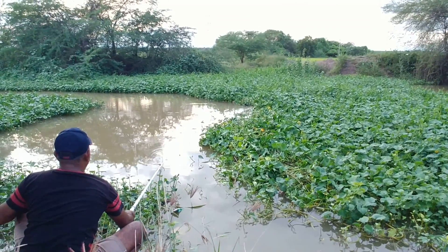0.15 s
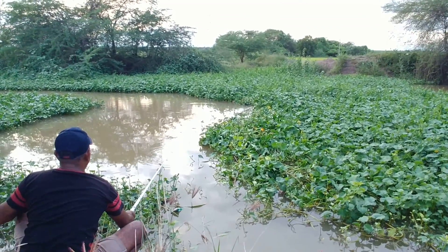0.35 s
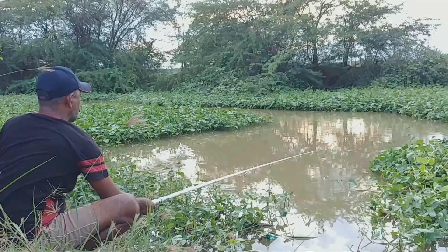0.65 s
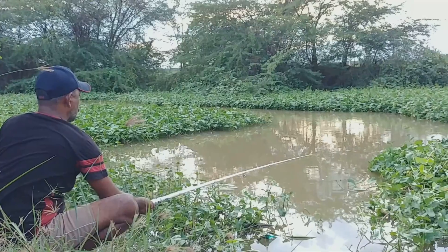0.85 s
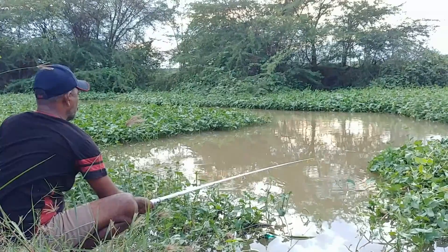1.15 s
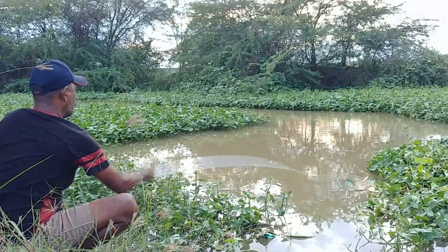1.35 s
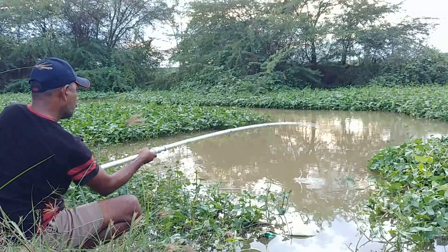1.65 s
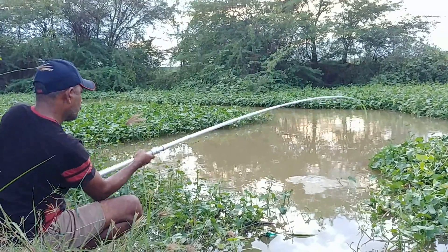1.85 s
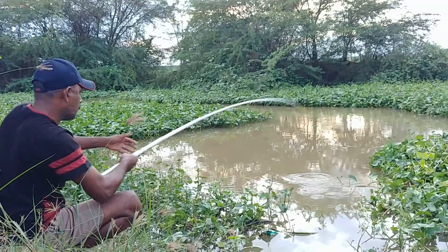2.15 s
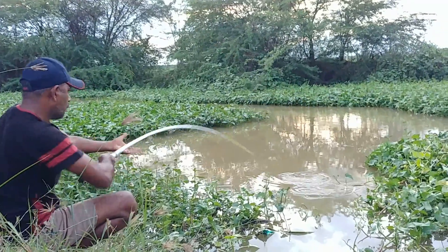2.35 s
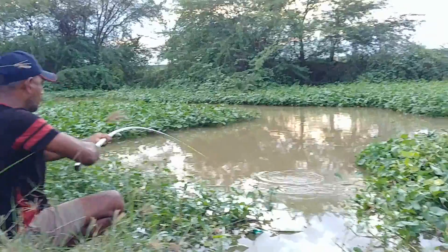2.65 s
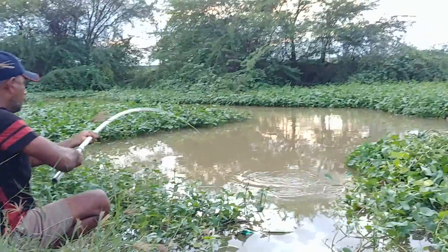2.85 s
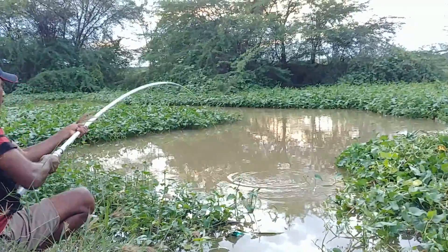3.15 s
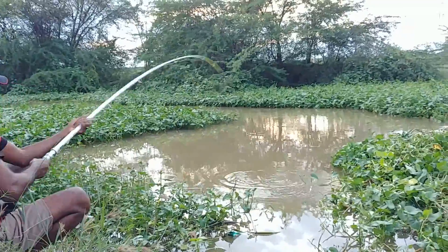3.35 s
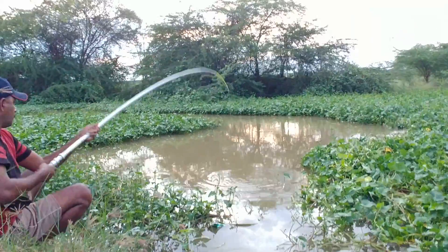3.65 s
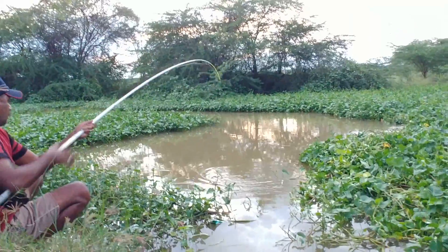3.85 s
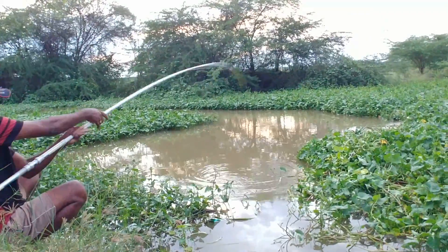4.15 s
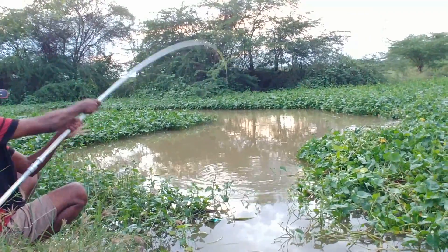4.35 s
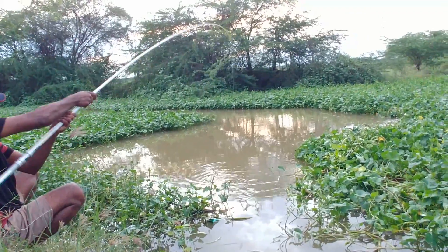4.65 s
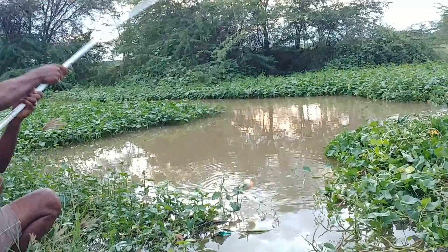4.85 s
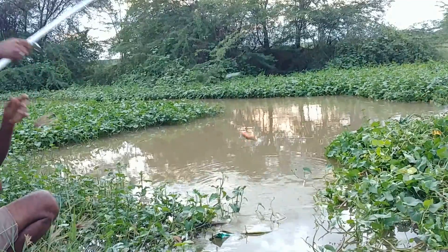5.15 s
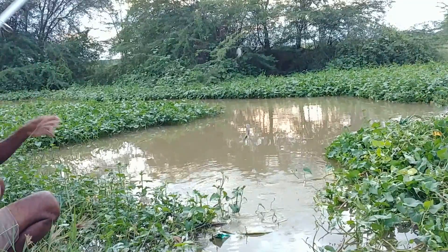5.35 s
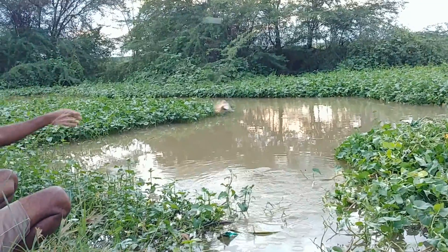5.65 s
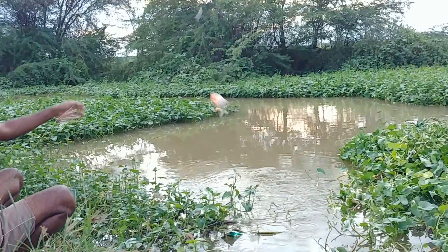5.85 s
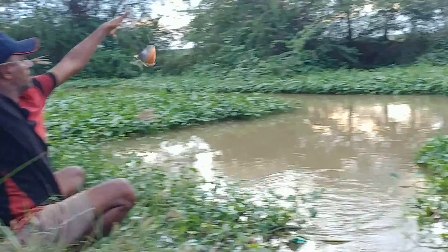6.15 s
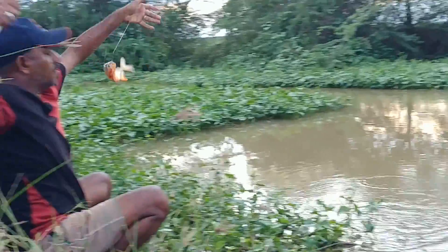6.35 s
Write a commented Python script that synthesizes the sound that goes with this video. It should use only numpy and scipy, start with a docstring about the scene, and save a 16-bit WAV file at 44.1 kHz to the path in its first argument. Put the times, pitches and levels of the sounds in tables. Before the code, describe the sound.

A broad low rush fills the first half second and stops abruptly, leaving open air, a faint distant engine hum and shrill crickets strongly on the left. Small birds twitter in quick sliding notes. A fish plops and splashes lightly, fingers thump and rub the microphone case on the right, then a hollow pole clacks and scattered drops ring as the fish comes up through wet leaves.

```python
"""A broad low rush fills the first half second over open air and a far pump engine, then stops abruptly.
Crickets shrill on the left from the start, with pulsed tones and noise bands; small birds twitter in gliding notes.
From 1.5 s a fish splashes at a weedy pond, in fizz and ringing drops; fingers knock and rub the microphone case.
From 4 s the angler's pole clacks in short decaying rings, as the fish is dragged up through wet leaves.
Table levels are relative: each layer adds its own trims."""
import sys
import numpy as np
from scipy import signal
from scipy.fft import rfft, irfft, next_fast_len
from scipy.io import wavfile
from scipy.ndimage import uniform_filter1d, map_coordinates

SR = 44100
rng = np.random.default_rng(int(sys.argv[2]) if len(sys.argv) > 2 else 0)


def to_wav(s):
    """Save 16-bit WAV."""
    ch = np.atleast_2d(s).T  # columns
    pcm = np.round(np.clip(ch, -1, 1) * 32767)  # PCM
    wavfile.write(sys.argv[1], SR, pcm.astype(np.int16))


N = 287532  # length in samples


def amp(db):
    """Decibels to linear gain."""
    return 10 ** (np.asarray(db) / 20)


def unit(x):
    """x scaled to rms 1."""
    return x / np.sqrt(np.mean(x ** 2) + 1e-20)


def along(points, hz):
    """Interpolate (f/Hz, value) points on a log frequency axis."""
    f, v = np.transpose(points)
    return np.interp(np.log(hz + 1), np.log(f), v)


def curve(rows):
    """One value per sample from (t/s, value) rows."""
    return np.interp(np.arange(N) / SR, *np.transpose(rows))


def wobble(rate):
    """A smooth random curve, rate knots a second."""
    knots = rng.standard_normal(int(N * rate / SR) + 4)
    return map_coordinates(knots, [np.arange(N) * rate / SR])


def clock(length):
    """Sample times in s over a sound of this length."""
    return np.arange(max(int(length * SR), 2)) / SR


def sine(hz):
    """A sine that follows a pitch curve."""
    return np.sin(2 * np.pi * np.cumsum(hz) / SR)


def noise():
    """White noise in one channel."""
    return rng.standard_normal(N)


def add(track, s, sound):
    """Mix a sound in at time s."""
    part = track[max(round(s * SR), 0):][:len(sound)]
    part += sound[:len(part)]


def filtered(x, response):
    """x times a response of frequency."""
    m = next_fast_len(N + 8192)
    return irfft(rfft(x, m) * response(np.fft.rfftfreq(m, 1 / SR)), m)[..., :N]


def equalized(x, spectrum):
    """x through an equalizer of (f/Hz, level/dB) points."""
    return filtered(x, lambda hz: amp(along(spectrum, hz)))


def coloured(x, spectrum):
    """x in the given colour, at rms 1."""
    return unit(equalized(x, spectrum))


def placed(x, right_db):
    """Full level on the left, right_db on the right."""
    return x * amp([[0], [right_db]])


def grains(rate, centre_hz, spread, cycles, size_db, rise):
    """Damped rings of random pitch and size, at rms 1; a positive rise bends each upward as it dies."""
    count = int(rate * N / SR)
    start = rng.integers(0, N, (count, 1))
    hz = np.minimum(centre_hz * np.exp(spread * rng.standard_normal((count, 1))), SR / 3)
    size = amp(size_db * np.minimum(rng.exponential(size=(count, 1)), 3))
    polarity = rng.choice([-1, 1], (count, 1))
    t = clock(min(4 * cycles / centre_hz, .02))
    age = t * hz / cycles
    tone = np.sin(2 * np.pi * hz * t * (1 + rise * np.minimum(age, 2)))
    rings = polarity * size * np.exp(-age) * tone
    return unit(np.bincount((start + np.arange(len(t))).ravel(), rings.ravel(), N)[:N])


def bursts(rows, edge, sag_db):
    """Soft-edged gain of (start, end, dB) bursts, sliding from 2 to 1 times sag_db above dB."""
    gain = np.zeros(N)
    for start, end, db in rows:
        t = clock(end - start)
        add(gain, start, amp(db + sag_db * (2.0 - t / t[-1])))
    return uniform_filter1d(gain, max(int(edge * SR), 1))


def trailing(gain, db, decay):
    """A gain curve with a weaker tail that dies away after each burst."""
    keep = np.exp(-1 / (decay * SR))
    tail_power = np.abs(signal.lfilter([1 - keep], [1, -keep], gain ** 2))
    return np.sqrt(gain ** 2 + amp(db) ** 2 * tail_power)


def banks(x, t60):
    """Scattered echo from the reeds and trees: a decaying noise tail, different in each ear."""
    t = clock(.4)
    tail = rng.standard_normal((2, len(t))) * amp(-60 * t / t60) * (1 - np.exp(-t / 0.011))
    return signal.fftconvolve(x[None], tail / np.linalg.norm(tail[0]), axes=1)[:, :N]


# How alike the two ears are: (f/Hz, likeness 0-1)
EAR_LIKENESS = [(50, 0.68), (250, 0.54), (600, 0.31), (1500, 0.04), (4000, 0.033)]


def diffuse(spectrum):
    """Wide stereo noise of rms 1: mid and side balance makes the ears alike in bass, unrelated in treble."""
    turn = lambda hz: np.arccos(np.clip(along(EAR_LIKENESS, hz), -1, 1)) / 2
    mid_side = lambda hz: np.array([np.cos(turn(hz)), np.sin(turn(hz))])
    mid, side = filtered(coloured(rng.standard_normal((2, N)), spectrum), mid_side)
    return np.array([mid + side, mid - side])


# Colour of the open air: (f/Hz, level/dB)
AIR_COLOUR = [(20, -26), (38, -7.5), (60, -2.5), (170, 1.5), (240, -4), (380, -14.5), (900, -19.5),
              (1700, -27), (3500, -29), (6000, -39), (9000, -43), (16000, -36.5)]


def open_air():
    """Diffuse, bass-heavy noise whose level drifts."""
    return placed(amp(-49.5 + 2.55 * wobble(4.65)) * diffuse(AIR_COLOUR), right_db=-2.5)


# Engine harmonics: (multiple of the firing rate, level/dB)
ENGINE_HARMONICS = [(1, -12), (2, 2.5), (3, -4), (4, -12.5), (5, -17)]
# Engine loudness: (t/s, level/dB)
ENGINE_LEVEL = [(0, -59.5), (.5, -48.5), (.56, -56), (1.8, -56), (3.3, -53), (5, -54), (6.52, -52)]


def engine():
    """Harmonics of a slightly unsteady firing rate, each wavering in level, make the far hum."""
    firing_hz = 67.6 * (1 + 0.00354 * wobble(3))
    hum = sum(amp(db + 1.6 * wobble(6)) * sine(k * firing_hz) for k, db in ENGINE_HARMONICS)
    return placed(hum * amp(curve(ENGINE_LEVEL) + 5.0), right_db=-5.5)


# Colour of the rush: (f/Hz, level/dB)
RUSH_COLOUR = [(25, 0), (60, 7.5), (180, 4.5), (320, -4.5), (430, -1.5), (520, -3.5), (1000, 1),
               (1350, -1.5), (1900, -15.5), (2900, -15), (4500, -34), (8000, -41), (15000, -42)]
# Low tones within the rush: (f/Hz, level/dB)
RUSH_TONES = [(183, -47.5), (215, -55), (430, -51.5)]


def rush():
    """Broad noise and wavering low tones swell slightly together, then cut off."""
    tones = sum(amp(db + 4.0 + 3.2 * wobble(10.9)) * sine(hz + 4 * wobble(16.0)) for hz, db in RUSH_TONES)
    gate = bursts([(0.002, .53, 0)], edge=0.0088, sag_db=-1)
    return placed(gate * (amp(-39.0) * diffuse(RUSH_COLOUR) + tones), right_db=-3.0)


# Farther crickets: (f/Hz, chirps a second, level/dB)
CRICKET_CHOIR = [(6846, 16, -73.5), (7040, 10, -61), (7170, 6.3, -72.5), (7400, 5.3, -61), (7470, 8.8, -84)]
# Colour of the blurred cricket chorus: (f/Hz, level/dB)
CHORUS_COLOUR = [(5500, -44), (6400, -10.5), (6750, -3.5), (7100, 2), (7400, -5), (7700, 1), (8100, -20),
                 (9000, -48)]


def far_crickets():
    """Farther crickets blur into pulsing, smeared tones over a band of high noise."""
    choir = np.zeros(N)
    for hz, rate, db in CRICKET_CHOIR:
        chirps = 0.37 + 0.64 * sine(rate * (1 + 0.078 * wobble(1.995)))
        # scattering in the weeds makes each tone waver in strength and pitch
        tone = amp(4 * wobble(150)) * sine(hz + 110 * wobble(400))
        choir += amp(db - 2.0) * unit(chirps * tone)
    chorus = amp(-63 + 0.97 * wobble(22)) * coloured(rng.standard_normal((2, N)), CHORUS_COLOUR)
    return placed(choir + chorus, right_db=-47)


# Bouts of the two near crickets: (first chirp t/s, end t/s, chirp period/s, f/Hz)
CRICKET_BOUTS = [(.024, 1.8, .1435, 7410), (2.151, 5, .146, 7420), (5.838, 6.5, .145, 7410),
                 (.583, 2.2, .1565, 7510), (2.815, 4.3, .157, 7510), (4.931, 6.5, .158, 7500)]
# Near cricket loudness: (t/s, level/dB)
NEAR_CRICKET_LEVEL = [(0, -47), (.2, -49.5), (.4, -57.5), (.65, -50), (1.3, -54), (1.7, -51), (2.3, -56),
                      (2.95, -44.5), (3.55, -46.5), (4.6, -55), (5.2, -53.5), (5.7, -44.5), (5.9, -42.5),
                      (6.15, -51.5), (6.45, -49)]
STROKE_S, STROKE_SPACING_S = .028, .04
STROKE_STEP_HZ, STROKE_SCATTER_HZ = 24.3, 13.4  # second stroke's mean step up; chance spread


def near_crickets():
    """Each chirp is two wing strokes, short tones that sag in pitch, repeated at a steady pace."""
    near, t = np.zeros(N), clock(STROKE_S)
    u = t / t[-1]
    for first, end, period, hz in CRICKET_BOUTS:
        for s in np.arange(first, end, period):
            for k in range(2):
                pitch = hz + k * STROKE_STEP_HZ + STROKE_SCATTER_HZ * rng.standard_normal()
                stroke = signal.windows.tukey(len(t), .7) * sine(pitch * (1 - .008 * (u - .5)))
                add(near, s + k * STROKE_SPACING_S - t[-1] / 2, amp(rng.normal(0, 1.9)) * stroke)
    near *= amp(curve(NEAR_CRICKET_LEVEL) + 1 + 1.2 * wobble(300))
    return placed(near + amp(-15) * banks(near, t60=.15), right_db=-47)


TRILL_START_S, TRILL_PERIOD_S, TRILL_S = .1, .602, .24  # first start, spacing, length


def far_trill():
    """A farther cricket's smeared tone pulses quickly and swells through each trill."""
    beat = (.5 + .5 * sine(55 + 4 * wobble(12))) * amp(0.81 * wobble(8.4))
    starts = np.arange(TRILL_START_S, N / SR, TRILL_PERIOD_S)
    gate = bursts([(s, s + TRILL_S, -64.5) for s in starts], edge=0.042, sag_db=-2)
    trill = gate * beat * unit(sine(5170 + 90 * wobble(350)))
    return placed(trill + amp(-6) * banks(trill, t60=.15), right_db=-20)


def hisses():
    """Two brief puffs of bright noise, mostly on the left."""
    gate = bursts([(.09, .15, -62), (.29, .33, -54.5)], edge=.02, sag_db=0)
    return placed(gate * coloured(noise(), [(2500, -11), (6000, -2), (15000, 2)]), right_db=-16)


# Runs of the farther bird: (start t/s, end t/s, level/dB)
FAR_BIRD_RUNS = [(.15, .52, -64), (1.25, 1.35, -63), (2.1, 2.33, -53), (2.6, 2.67, -47),
                 (3.29, 3.35, -45.5), (3.72, 3.81, -53), (5.3, 5.42, -55.5), (6.13, 6.3, -58.5)]


def far_bird():
    """Quick up-and-down pitch zigzags, blurred by the bushes."""
    zigzag = signal.sawtooth(2 * np.pi * np.cumsum(42 + 8 * wobble(25)) / SR, .4)
    tone = unit(sine(2830 + 380 * zigzag) * amp(4.9 * wobble(90)))
    song = bursts(FAR_BIRD_RUNS, edge=0.0092, sag_db=-3.0) * tone
    return placed(amp(2) * song + amp(-3) * banks(song, t60=0.3), right_db=-10)


# The nearer bird's arched notes: (top t/s, rise length/s, top f/Hz, level/dB)
BIRD_NOTES = [(0.189, 0.035, 3170, -54), (.41, .035, 3200, -54), (0.511, 0.019, 3265, -49.5),
              (.563, 0.028, 3210, -45.5), (1.235, 0.038, 3320, -48), (1.292, 0.038, 3356, -44.5),
              (1.32, 0.0084, 3116, -52.5), (2.065, 0.036, 3340, -46), (2.117, 0.019, 3210, -47.5),
              (2.162, .014, 3186, -44), (2.26, 0.044, 3390, -48.5), (2.314, 0.015, 3120, -66),
              (2.342, .008, 3140, -43), (2.567, .06, 3100, -54), (2.989, .027, 3400, -46),
              (3.088, 0.018, 3300, -48), (3.249, 0.036, 3120, -53.5), (3.73, 0.076, 3285, -54.5),
              (3.779, 0.032, 3250, -53), (4.04, 0.048, 3070, -56), (4.115, 0.018, 3280, -53.5),
              (4.553, 0.028, 3440, -43.5), (4.649, 0.023, 3260, -47.5), (5.303, 0.018, 3390, -44),
              (5.356, .008, 3060, -51), (5.423, .038, 3160, -55.5), (5.935, .025, 3150, -50.5),
              (6.187, 0.083, 2940, -54), (6.23, .008, 3060, -53), (6.271, .025, 3340, -50),
              (6.491, 0.075, 3170, -56)]
FALL_S, FALL_SHARE = 0.01885, 0.248  # closing down-slide: length, share of the pitch it drops
HOLD_SHARE, RISE_DB = .82, -6.5  # rise: held pitch over top pitch, level against the fall


def bird():
    """Each note scoops up, holds, flicks to its top and slides straight down."""
    song = np.zeros(N)
    tone = lambda u, hz: unit(np.abs(np.sin(np.pi * u)) ** .5 * sine(hz))
    for s, rise, top_hz, db in BIRD_NOTES:
        u = clock(rise) / rise
        bend = u ** 6 - 0.567 * np.exp(-u / 0.106)
        rise_hz = top_hz * (HOLD_SHARE + (1 - HOLD_SHARE) * bend)
        add(song, s - rise, amp(db + RISE_DB) * tone(u, rise_hz))
        u = clock(FALL_S) / FALL_S
        add(song, s, amp(db) * tone(u, top_hz * (1 - FALL_SHARE * u)))
    song *= amp(-1.5 + 2.5 * wobble(200))
    # the water and the bank return each note a little later
    echo = sum(amp(db) * np.pad(song, round(delay * SR))[:N] for delay, db in [(.007, -12), (.012, -13)])
    return placed(song + echo + amp(-10) * banks(song, t60=.3), right_db=-8)


WHINE_START_S, WHINE_PERIOD_S, WHINE_S = .51, .338, .25  # first start, spacing, length
WHINE_HZ, WHINE_RISE_HZ_PER_S, WHINE_FADE_DB_PER_S = 3850, 85, 0.7


def far_whine():
    """A thin insect whine of two high partials arches in pitch; repeats creep upward and fade."""
    whine, t = np.zeros(N), clock(WHINE_S)
    u = t / t[-1]
    for s in np.arange(WHINE_START_S, N / SR, WHINE_PERIOD_S):
        arch = .045 * u * (1 - rng.uniform(1, 2) * u)
        pitch = (WHINE_HZ + WHINE_RISE_HZ_PER_S * s) * (1 + arch + .006 * wobble(160)[:len(t)])
        tone = sine(pitch) + amp(-5) * sine(pitch * 7 / 6)
        add(whine, s, amp(-WHINE_FADE_DB_PER_S * s) * signal.windows.tukey(len(t), .4) * tone)
    whine *= amp(-69.5 + 3 * wobble(90) + 1.2 * wobble(6))
    return placed(whine + amp(-6) * banks(whine, t60=.15), right_db=-20)


def drop(hz):
    """A drop traps a main bubble and two weaker ones of other sizes, all rising in pitch."""
    t = clock(.03)
    trapped = [(1, 1), (rng.uniform(1.0, 1.7), .45), (rng.uniform(0.63, 1.0), .35)]
    ring = sum(g * np.sin(2 * np.pi * hz * ratio * t * (1 + 2 * t)) for ratio, g in trapped)
    return ring * np.exp(-t / .0028) * (1 - np.exp(-t / .0003))


# Splashes of the fish and flicks of water on the leaves: (t/s, length/s, level/dB,
# depth/dB for more bubbles and less fizz, first drop f/Hz, first drop level/dB)
SPLASH_EVENTS = [(1.497, 0.051, -50, 0, 1590, -46), (1.582, 0.027, -40.5, 11.5, 960, -28.5),
                 (1.734, .12, -57, 6, 1840, -41), (1.919, 0.0078, -58, 17, 1200, -45),
                 (2.426, 0.013, -40.5, 3, 1260, -40.5), (3.285, 0.07, -55.5, 1, 3060, -36),
                 (4.813, 0.0092, -44.5, 1, 1324, -28.5), (4.828, 0.036, -45.5, -4.5, 4000, -39),
                 (4.957, 0.019, -50, 1, 2400, -34.5), (5.139, 0.029, -48, -1, 2930, -49),
                 (5.282, 0.051, -48, -4, 3740, -39), (5.346, 0.018, -55.5, 6.5, 2360, -28),
                 (5.495, 0.1, -54, -4.5, 2800, -35), (5.622, 0.059, -54.5, -4, 3620, -36.5),
                 (5.726, .025, -52.5, 0, 3730, -38), (5.827, 0.015, -47.5, 3.5, 3790, -40),
                 (5.88, 0.04, -53, -5.5, 3240, -39), (6.029, 0.033, -57, -2.5, 3980, -55),
                 (6.071, 0.025, -47, -2, 2300, -29.5), (6.379, 0.037, -56, 0.5, 2400, -41),
                 (6.43, 0.012, -53, 2.5, 2920, -44)]
# Colour of the fizz and ticks: (f/Hz, level/dB)
FIZZ_COLOUR = [(2500, -9), (4200, -4), (5500, 3), (6500, -4.5), (8000, 10), (10000, -12), (15500, -3.5)]
SLAP_DB = 10.5  # trim of the first drop's tick
AFTER_S, AFTER_DB, AFTER_HZ = 0.031, -12, 2830  # later drops: mean delay, level trim, typical ring
LEAD_S, LEAD_DB = .02, -17  # water stirs before each splash: how long, level trim


def splashes():
    """Water stirs, ticks and rings a drop, sprays bubbles, patter and fizz, and trails off in later drops."""
    start, length, level_db, depth_db = np.transpose(SPLASH_EVENTS)[:4]
    clumps = amp(3.2 * wobble(190) - 1)

    def spray(db):
        lead = bursts(zip(start - LEAD_S, start, db + LEAD_DB), edge=0.017, sag_db=5)
        body = bursts(zip(start, start + length, db), edge=0.021, sag_db=4.0)
        return clumps * (lead + trailing(body, db=-12.5, decay=0.074))

    big = grains(rate=1500, centre_hz=1220, spread=0.31, cycles=4.6, size_db=-5, rise=0.019)
    small = grains(rate=1000, centre_hz=2900, spread=0.23, cycles=4.7, size_db=4.0, rise=0.015)
    crackle = grains(rate=1100, centre_hz=7000, spread=.5, cycles=.6, size_db=5.5, rise=0)
    bubbles = spray(level_db + depth_db - 12.5) * big
    patter = spray(level_db - 4.5) * small
    fizz = spray(level_db - depth_db - 5) * coloured(crackle, FIZZ_COLOUR)
    rings, ticks, t = np.zeros(N), np.zeros(N), clock(.03)
    for s, _, db, depth, hz, ring_db in SPLASH_EVENTS:
        tick = amp(db - depth + SLAP_DB) * np.exp(-t / 0.005)
        add(rings, s, amp(ring_db + 4) * drop(hz))
        add(ticks, s, tick)
        for delay in rng.gamma(2, AFTER_S / 2, 2):
            later_hz = AFTER_HZ * np.exp(0.18 * rng.standard_normal())
            add(rings, s + delay, amp(ring_db + 3 + AFTER_DB) * drop(later_hz))
            add(ticks, s + delay, amp(AFTER_DB) * tick)
    water = bubbles + patter + fizz + rings + ticks * coloured(noise(), FIZZ_COLOUR)
    left, right = water + amp(-14) * banks(water, t60=.18)
    # a finger over the right port shades it from the treble
    shade = [(800, -11.0), (2500, -12), (4500, -17.5), (7500, -30), (14000, -18)]
    return np.array([left, equalized(right, shade)])


# Short strings of large bubbles that burst after a splash: (t/s, level/dB)
PLOP_STRINGS = [(1.622, -44), (1.876, -47.5), (4.868, -35.5)]
PLOP_HZ, PLOP_SPREAD = 860, 0.15  # base pitch; log scatter, wider for each later bubble
PLOP_GAP_S, PLOP_LOSS_DB = 0.018, 3  # from one bubble to the next


def plops():
    """Each bubble rings and rises in pitch as it nears the surface; the next is weaker and of another size."""
    water, t = np.zeros(N), clock(.04)
    for s, db in PLOP_STRINGS:
        for k in range(3):
            hz = PLOP_HZ * np.exp(PLOP_SPREAD * k * rng.standard_normal())
            ring = sine(hz * (1 + 3 * t)) * np.exp(-t / 0.0053) * (1 - np.exp(-t / .001))
            add(water, s + k * PLOP_GAP_S, amp(db - k * PLOP_LOSS_DB) * ring)
    return placed(water, right_db=-4.5)


# Knocks on the case: (t/s, level/dB, start f/Hz, life/s, crack level/dB, share on the left 0-1)
CASE_KNOCKS = [(1.983, -24.5, 250, 0.012, -77, 0), (2.334, 5.5, 543, 0.0049, -3.5, 0.02),
               (2.377, -17.5, 304, 0.0073, -61, .05), (2.4775, -6.5, 860, 0.0013, -48, 0.03),
               (2.608, -8, 1310, 0.00064, -35, 0), (2.7073, -12.5, 1010, 0.0043, -17.5, 0.22),
               (2.872, -30.5, 1730, 0.0019, -65, 0), (3.1157, -15.5, 900, 0.0011, -50, 0.04),
               (3.2831, -4, 664, 0.0034, -49, 0.43), (5.5607, -6.5, 910, 0.00061, -36, 0.03),
               (6.2572, -6, 2480, 0.00036, -28, 0.12)]


def knocks():
    """A knock is a few cycles that drop in pitch as the case settles, plus a crack near the right port."""
    hits, t = np.zeros((2, N)), clock(.04)
    for s, db, hz, life, crack_db, left in CASE_KNOCKS:
        envelope = np.exp(-(t / life) ** 2.64) * (1 - np.exp(-t / (0.065 * life)))
        thud = amp(db - 5) * sine(hz / (1 + t / (0.54 * life))) * envelope
        crack = amp(crack_db) * np.sin(2 * np.pi * 2400 * t) * np.exp(-t / 0.00026)
        add(hits[1], s, thud + crack)
        add(hits[0], s, -left * thud)  # opposite polarity on the left
    return equalized(hits, [(3000, 0), (5000, -33), (9000, -31)])


# Finger rubs: (start t/s, end t/s, level/dB)
FINGER_RUBS = [(2.34, 2.37, -50), (2.472, 2.495, -43.5), (2.602, 2.624, -36.5), (2.649, 2.674, -35),
               (2.7, 2.728, -36), (3.114, 3.14, -52.5), (3.284, 3.37, -38), (3.37, 3.41, -43.5),
               (4.58, 4.61, -50), (5.563, 5.58, -41.5), (6.244, 6.28, -51)]
# Colour of the rubs: (f/Hz, level/dB)
RUB_COLOUR = [(40, 4), (130, 8), (300, 0.5), (500, 5), (800, 1), (1250, -0.5), (1800, -13.5), (3000, -12.5),
              (4200, -20), (7000, -32), (16000, -37)]


def rubs():
    """Fingers rub the case in dense, dull slips, unrelated in the two ears."""
    slip = lambda: grains(rate=2500, centre_hz=3080, spread=1.0, cycles=0.15, size_db=3.0, rise=0)
    slips = np.array([coloured(slip(), RUB_COLOUR) for _ in range(2)])
    pressure = trailing(bursts(FINGER_RUBS, edge=0.0056, sag_db=3.5), db=-7.5, decay=0.027)
    pressure *= amp(2.2 * wobble(170) - .5)
    return pressure * slips * amp([[-10], [0]])


# Clacks of the loaded pole: (t/s, level/dB)
POLE_CLACKS = [(4.041, -43), (4.0865, -24.5), (4.1868, -28.5), (4.6014, -30), (6.355, -38.5)]
# Contacts in each clack, a touch, the blow and a bounce: (delay t/s, level/dB)
CLACK_CONTACTS = [(-.009, -11), (0, -1.5), (.0055, -5.5)]
# Ringing modes of the hollow pole: (f/Hz, level/dB, t60/s)
POLE_MODES = [(1320, -23, 0.022), (2285, 4.5, 0.03), (2317, -3, 0.0098), (2710, -6, 0.022),
              (2800, -4.5, 0.027), (3360, -7, 0.022), (4030, -4, 0.021), (4180, -34, 0.007),
              (5700, -15, .01)]


def pole():
    """Each contact is a dry snap that rings the hollow pole at new strengths; the grip shifts its pitch."""
    ring, snaps, t = np.zeros(N), np.zeros(N), clock(.04)
    contacts = [(s + delay, db + step_db) for s, db in POLE_CLACKS for delay, step_db in CLACK_CONTACTS]
    for s, db in contacts:
        for hz, level, t60 in POLE_MODES:
            pitch = hz * (1 + .012 * rng.standard_normal())
            decay = amp(db + level + rng.normal(0, 0.73) - 60 * t / t60)
            add(ring, s, decay * np.sin(2 * np.pi * pitch * t) * (1 - np.exp(-t / 0.0012)))
        add(snaps, s, amp(db - 11.0) * np.exp(-t / 0.006))
    ring += snaps * coloured(noise(), [(1200, -2), (2200, 15), (4000, 7.5), (8000, -1.5), (15000, -28)])
    return placed(ring + amp(-16) * banks(ring, t60=.1), right_db=-13)


def scene():
    """All layers of the pond, mixed."""
    ambience = open_air() + engine() + rush() + hisses()
    insects = near_crickets() + far_crickets() + far_trill() + far_whine()
    birds = far_bird() + bird()
    landing = splashes() + plops() + knocks() + rubs() + pole()
    return ambience + insects + birds + landing


# Colour of the microphone ports: (f/Hz, level/dB)
PORT_COLOUR = [(22, -38), (50, -2), (6500, 0.5), (8000, 4), (9200, -2.5), (10500, -10), (12000, -6.5),
               (14000, -1), (16000, -3.5)]
TOP_HZ = 15850  # band limit


def record(dry):
    """The ports colour the sound, strong peaks overload softly, and nothing is kept above the band limit."""
    x = equalized(dry, PORT_COLOUR)
    x = x / (1 + np.abs(x / .58) ** 6) ** (1 / 6)
    return filtered(x, lambda hz: hz < TOP_HZ)


dry = scene()
out = record(dry)
to_wav(out)
```